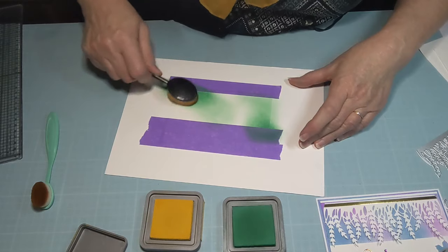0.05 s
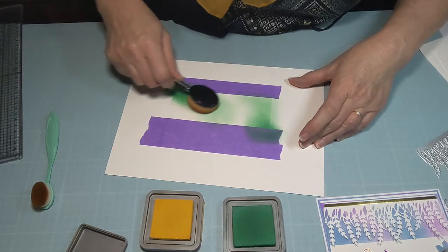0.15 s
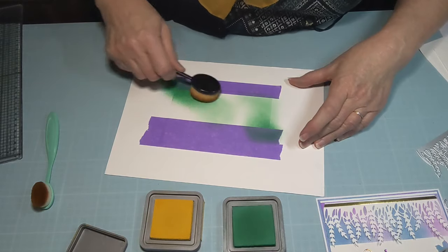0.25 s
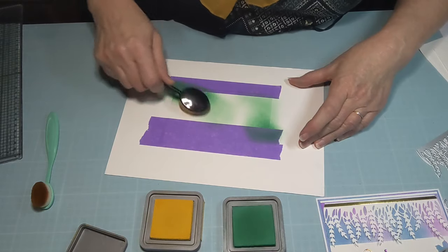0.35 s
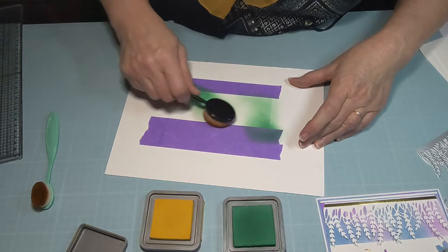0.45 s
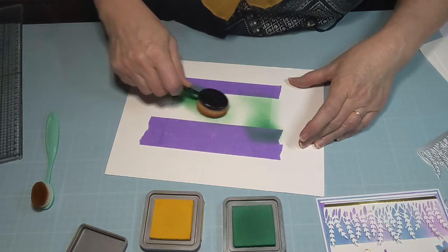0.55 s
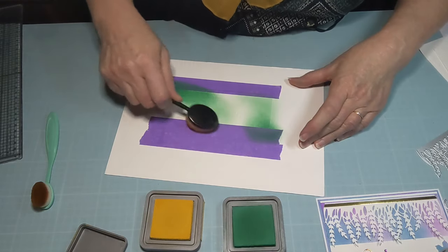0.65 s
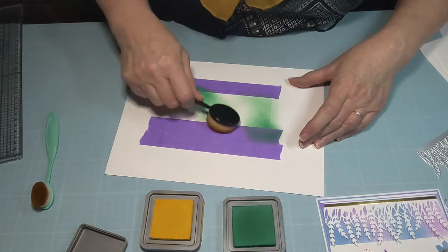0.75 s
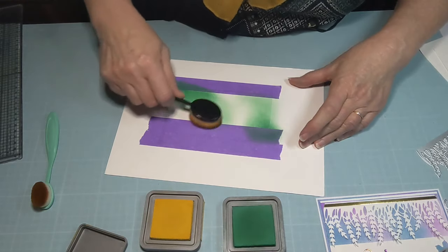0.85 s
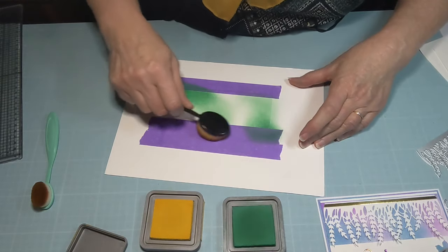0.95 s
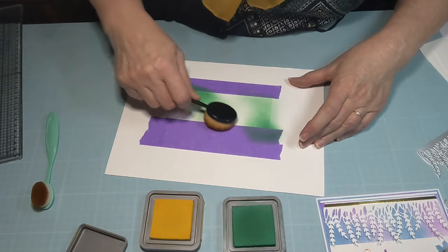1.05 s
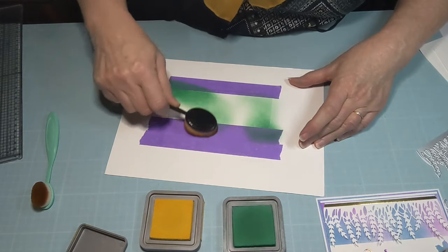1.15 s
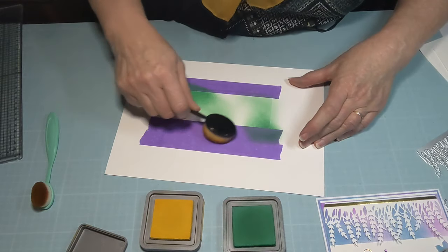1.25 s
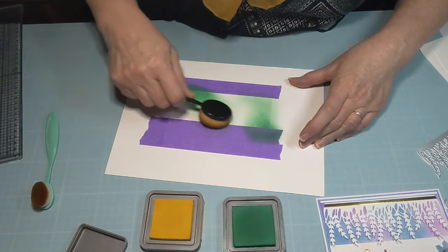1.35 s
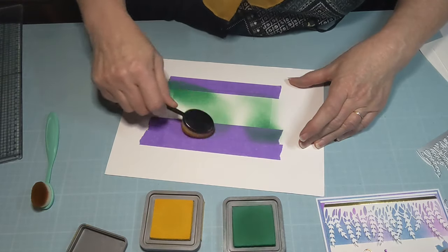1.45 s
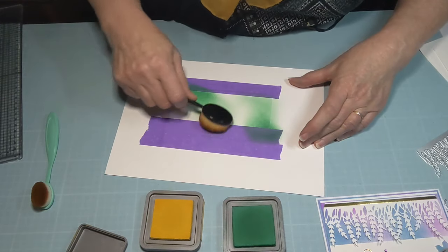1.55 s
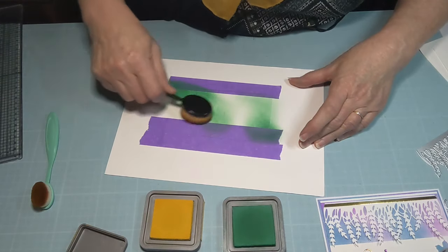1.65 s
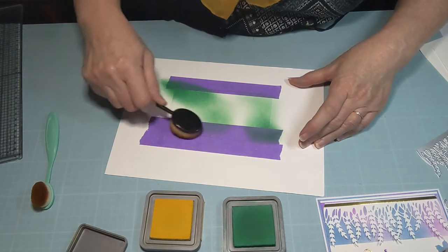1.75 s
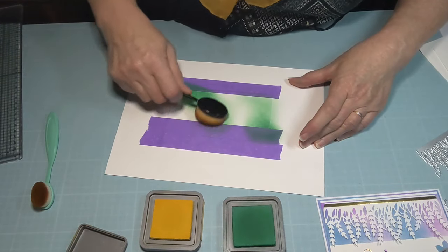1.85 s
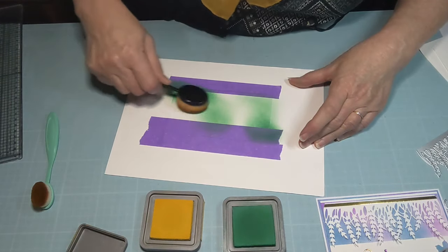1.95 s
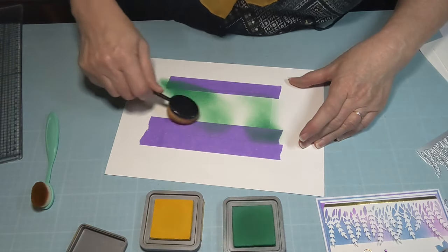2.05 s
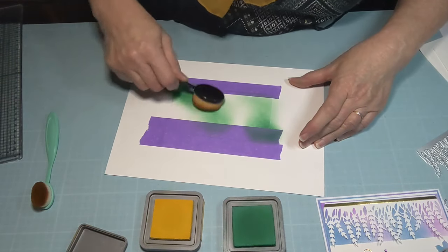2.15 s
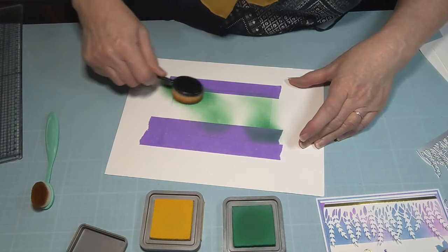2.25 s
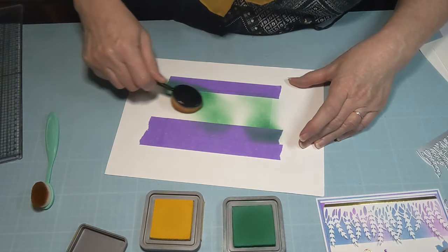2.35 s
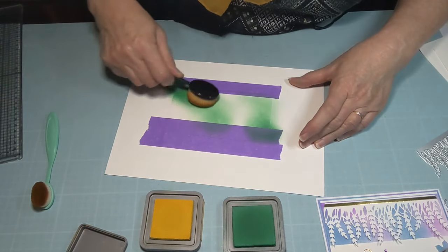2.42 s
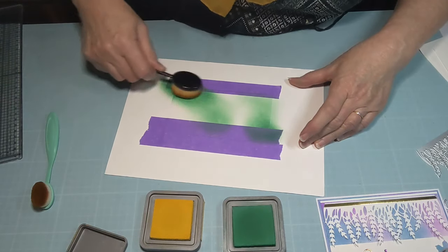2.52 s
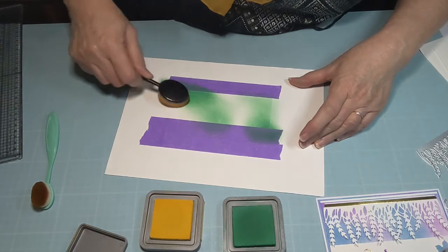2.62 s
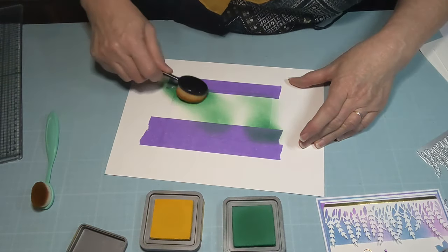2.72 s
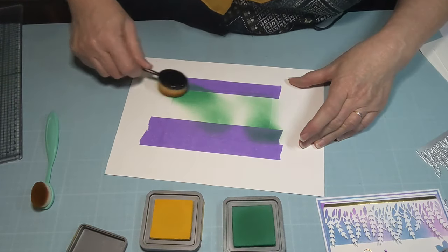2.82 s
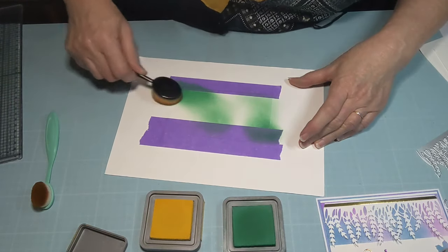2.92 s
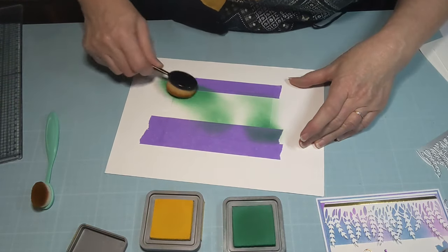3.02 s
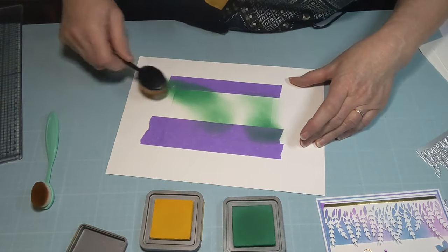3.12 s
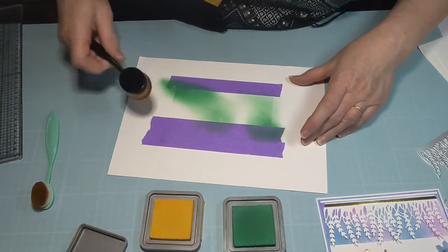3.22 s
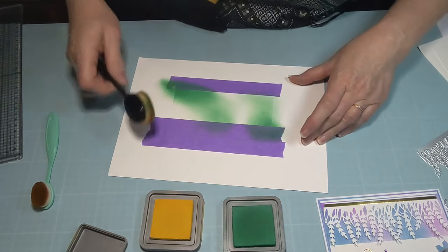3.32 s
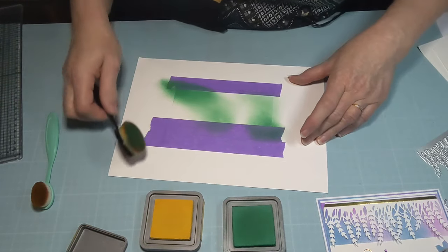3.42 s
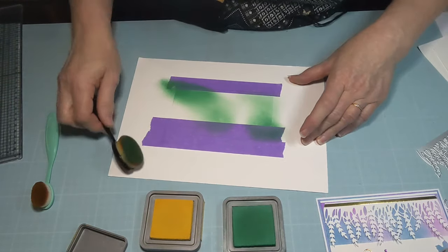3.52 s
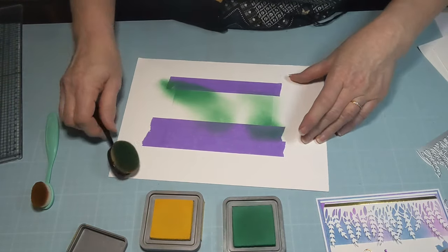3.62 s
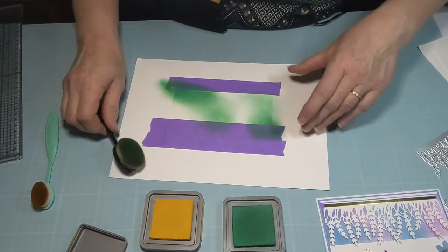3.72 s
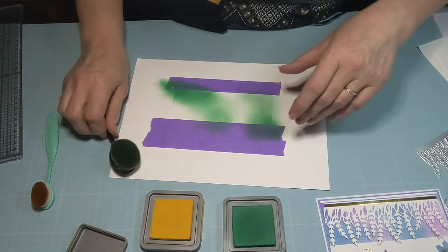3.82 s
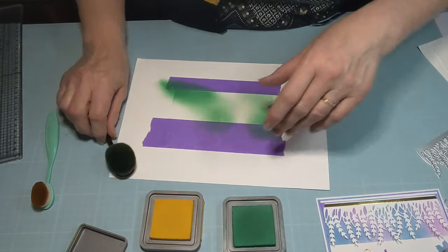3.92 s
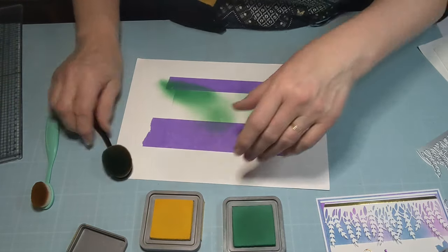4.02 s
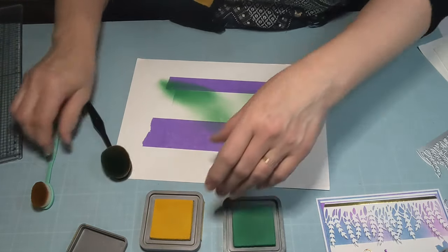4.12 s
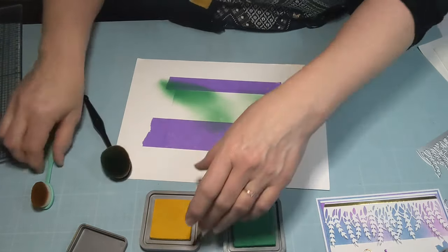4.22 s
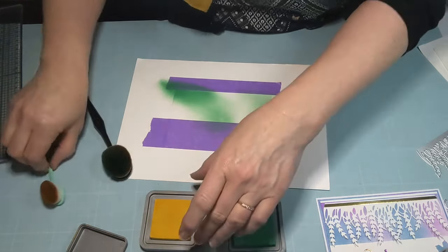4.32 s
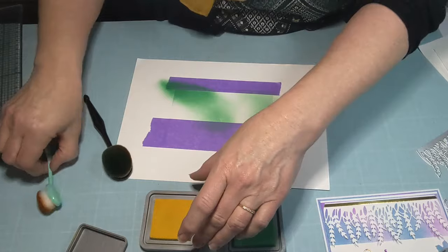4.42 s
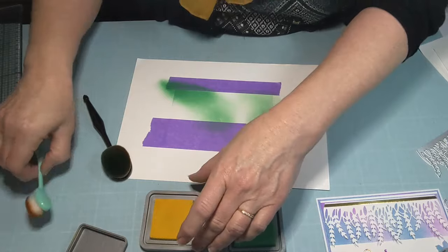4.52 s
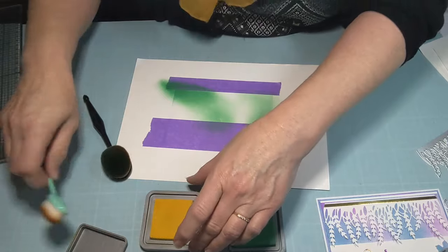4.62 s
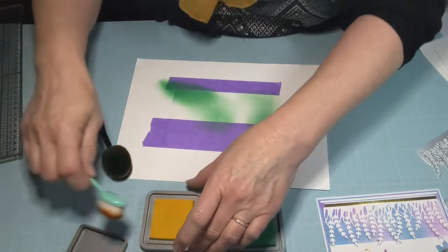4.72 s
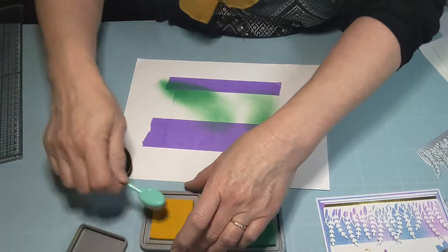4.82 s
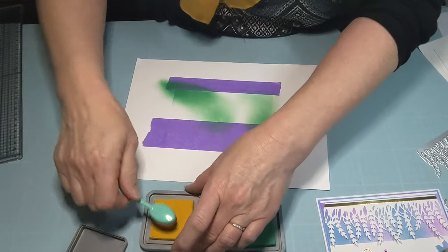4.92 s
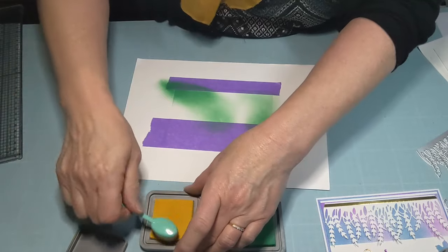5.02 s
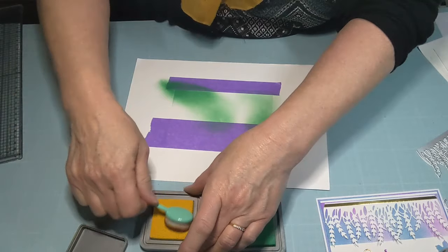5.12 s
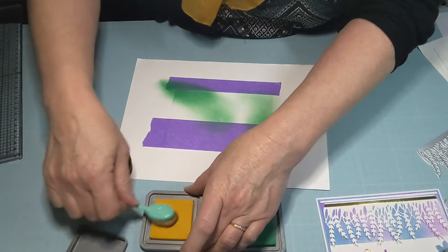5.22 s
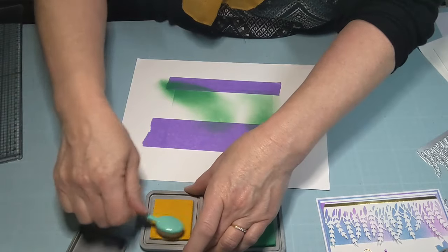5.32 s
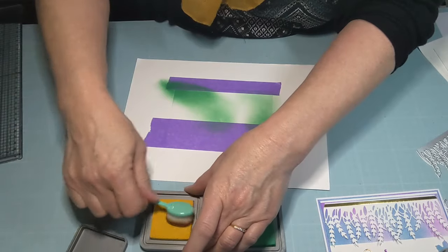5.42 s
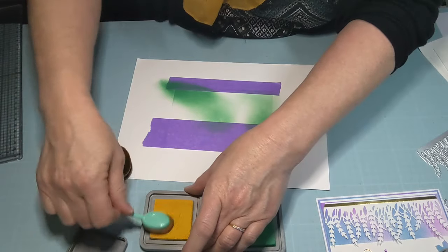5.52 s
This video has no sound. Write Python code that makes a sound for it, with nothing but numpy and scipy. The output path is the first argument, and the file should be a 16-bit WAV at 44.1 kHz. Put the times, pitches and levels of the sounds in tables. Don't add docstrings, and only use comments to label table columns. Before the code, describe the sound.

Airy bristle swishes, several each two seconds, play over a low room rumble and faint stereo hiss. After three seconds they stop; a hard brush handle strikes the tabletop, rocks and knocks again. A plastic click and gritty scrape follow as another brush is lifted, then a near-quiet gap and faint foam dabs with light bristle rustle. Overhead stereo microphones, small quiet room, short reverberation.

```python
import sys
import numpy as np
from scipy import signal
from scipy.fft import rfft, irfft, next_fast_len
from scipy.io import wavfile
from scipy.ndimage import map_coordinates

SR = 44100
rng = np.random.default_rng(int(sys.argv[2]) if len(sys.argv) > 2 else 0)


def store_wav(level_fs):
    pcm = np.round(np.clip(np.atleast_2d(level_fs), -1, 1) * 32767)
    wavfile.write(sys.argv[1], SR, pcm.T.astype(np.int16))


def gain_from_db(level_db):
    decades = np.asarray(level_db, float) / 20
    return 10 ** decades


N = 245676


def unit(x):
    return x / np.sqrt(np.mean(x ** 2) + 1e-20)


def along(points, hz):
    f, value = np.transpose(points)
    return np.interp(np.log(hz + 1), np.log(f + 1), value)


def wobble(rate):
    knots = rng.standard_normal(int(N * rate / SR) + 4)
    return map_coordinates(knots, [np.arange(N) * rate / SR])


def filtered(x, response):
    m = next_fast_len(x.shape[-1] + 8192)
    spectrum = rfft(x, m) * response(np.fft.rfftfreq(m, 1 / SR))
    return irfft(spectrum, m)[..., :x.shape[-1]]


def resonant(peaks):
    def response(f):
        total = 0
        for k, (centre, width, db) in enumerate(peaks):
            damping = 1j * f * width
            total = total + (-1) ** k * gain_from_db(db) * damping / (centre * centre - f * f + damping)
        return total
    return response


def pair(a, b, alike, lead):
    def turn(hz):
        return np.arccos(np.clip(alike(hz), -1, 1)) / 2

    def side(sign):
        shift = lambda hz: np.exp(0.5j * sign * lead(hz))
        common = filtered(a, lambda hz: np.cos(turn(hz)) * shift(hz))
        opposed = filtered(b, lambda hz: np.sin(turn(hz)) * shift(hz))
        return common + sign * opposed

    return np.array([side(1), side(-0.9)])


# f/Hz, left-right likeness
DIFFUSE_LIKENESS = [(60, 1), (130, 0.89), (290, 0.56), (640, 0.44), (1410, -0.057), (3100, -0.2),
                    (6820, -0.0067), (15000, -0.033)]


def diffuse(hz):
    return along(DIFFUSE_LIKENESS, hz)


# f/Hz, level per Hz/dB
VENTILATION = [(15, -47), (25, -16), (72, 2.5), (125, -3), (230, -12), (520, -19), (900, -33), (1980, -120)]
# f/Hz, level per Hz/dB
HISS_SPECTRUM = [(410, -4), (875, -3.5), (1620, -5), (4490, -11), (6150, -10.5), (9350, -11),
                 (13300, -17.5), (16000, -23)]
# f/Hz, width/Hz, lift/dB
STANDING_WAVES = [(56, 2, 9.5), (90, 16.3, -1), (122.8, 8.4, 0.5), (143.7, 3.9, -3), (311.5, 6.1, 5.5),
                  (347.3, 28, 3.5), (477, 46, 0.5), (665, 33, 6)]


def background():
    def lift(hz):
        return 1 + sum(gain_from_db(db) / (1 + (2 * (hz - f) / width) ** 2) for f, width, db in STANDING_WAVES)

    rumble = filtered(rng.standard_normal((2, N)), lambda hz: gain_from_db(along(VENTILATION, hz)) * lift(hz))
    hiss = filtered(rng.standard_normal((2, N)), lambda hz: gain_from_db(along(HISS_SPECTRUM, hz)))
    air = gain_from_db(-55.5 + 1.26 * wobble(9)) * unit(rumble) + gain_from_db(-65.0) * unit(hiss)
    return pair(*air, diffuse, lambda hz: 0.00065 * hz * (hz < 900))


USUAL_DB = -62.5


def played(rows, attack, release, overlap, grows):
    t, gains = np.arange(N) / SR, 0
    for start, end, first_db, last_db, tied_db in rows:
        rise, fall = (t - start + overlap) / attack, (end + overlap - t) / release
        edge = np.clip(np.minimum(rise, fall), 0, 1)
        main = edge * gain_from_db(np.interp(t, [start, end], [first_db, last_db]) - USUAL_DB)
        gains = np.maximum(gains, gain_from_db(USUAL_DB) * np.array([main, gain_from_db(tied_db) * main ** grows]))
    return gains


def slips(grain_db, patch_db):
    clumps = gain_from_db(patch_db * wobble(60) + patch_db * wobble(18))
    sizes = gain_from_db(grain_db * rng.exponential(size=(2, N)))
    return clumps * sizes * rng.standard_normal((2, N))


# start t/s, end t/s, first level/dB, last level/dB, pressure/dB
ARCS = [(0.01, 0.172, -56.5, -63.5, -6.5), (0.141, 0.43, -60.5, -63, -5.5),
        (0.396, 0.569, -55, -61.0, -5.5), (0.579, 0.84, -58, -59.5, -5.5),
        (0.857, 1.047, -58.0, -64.5, -3.5), (0.998, 1.095, -63, -61.5, -1),
        (1.102, 1.213, -60.0, -61.5, -4.5), (1.169, 1.281, -62, -59.5, -5.5),
        (1.258, 1.546, -62.5, -63, -5.0), (1.557, 1.728, -68.5, -58, -6), (1.677, 1.828, -55.0, -61.5, -7),
        (1.839, 2.111, -62, -56.5, -7), (2.133, 2.395, -59.5, -59.5, -6.0), (2.42, 2.545, -60, -66, -4),
        (2.533, 2.693, -58.0, -60.5, -5.5), (2.703, 2.848, -62.5, -67.5, -6.5),
        (2.821, 2.973, -58, -59.5, -8.0), (2.999, 3.169, -61.5, -65.0, -9), (3.173, 3.257, -68, -67, -17),
        (3.228, 3.305, -62, -63, -8.0), (3.262, 3.514, -61, -82, -13)]
PASSING_TOUCHES = [(3.675, 3.755, -55, -64.5, -8.5), (3.785, 3.84, -61.5, -64, -3),
                   (3.84, 3.885, -60, -66, -0.5), (4.56, 4.66, -67, -69.5, -16),
                   (4.66, 4.78, -64.5, -76, -12), (4.85, 4.97, -68, -72, -9), (5.05, 5.1, -66, -68, -12),
                   (5.13, 5.27, -69, -63, -5.5), (5.275, 5.375, -62, -60.5, -10), (5.39, 5.5, -62, -69, -5),
                   (5.49, 5.62, -63.5, -64, -5.5)]
# f/Hz, width/Hz, level/dB
BRISTLE_MODES = [(6030, 1820, -1), (8340, 950, 2), (9980, 1030, -2)]
# f/Hz, width/Hz, level/dB
PAPER_MODES = [(1025, 230, -0.5), (2600, 1620, 1)]
# f/Hz, width/Hz, level/dB
TIP_MODES = [(12040, 1900, 0)]
# f/Hz, left lead/rad
BRUSH_LEAD = [(0, -26), (1290, 1.2), (3450, 0.84), (6460, 3), (8010, 9), (10400, 8), (14500, 12.5),
              (16100, 4)]
RUB_GROWS, TIPS_GROW = 0.695, 1.13
TIPS_DB, TOUCH_TIPS_DB = -8.5, 4.5


def rubbing():
    bodies = (BRISTLE_MODES, PAPER_MODES, TIP_MODES)
    bristles, sheet, tips = [unit(filtered(slips(2.0, 1.09), resonant(body))) for body in bodies]
    arcs, rub = played(ARCS, attack=0.091, release=0.057, overlap=0.035, grows=RUB_GROWS)
    light, touch = played(PASSING_TOUCHES, attack=0.073, release=0.033, overlap=0.014, grows=RUB_GROWS)
    tip_speed = (arcs + gain_from_db(TOUCH_TIPS_DB) * light) / gain_from_db(USUAL_DB)
    mix = gain_from_db(3.0) * (arcs + light) * bristles
    mix += gain_from_db(3.5) * (rub + touch) * sheet
    mix += gain_from_db(USUAL_DB + TIPS_DB) * tip_speed ** TIPS_GROW * tips
    spread = pair(*mix, lambda hz: np.full_like(hz, 0.29), lambda hz: along(BRUSH_LEAD, hz))
    return spread * gain_from_db([[0.4], [-0.4]])


def ring(modes, t, attack, lift_db):
    hz, db, t60 = np.transpose(modes)[:, :, None]
    strength, start_phase, place = rng.standard_normal((3, len(modes), 1))
    side = np.array([1, -1])[:, None, None]
    phase = 0.41 * start_phase + side * (0.0001 * hz + 0.00062 * hz * place)
    decay = gain_from_db(db + lift_db(hz) + 2.4 * strength - 60 * t / t60)
    waves = decay * np.sin(2 * np.pi * hz * t + phase)
    return -waves.sum(1) * (1 - np.exp(-t / attack))


def soft(contact):
    return lambda f: 1 / (1 + 1.5j * (f * contact / 250) - (f * contact / 250) ** 2) ** 2


# t/s, peak level/dB, boom against peak/dB, contact time/ms, favoured mode f/Hz
TABLE_BLOWS = [(2.655, -54, -19, 0.18, 450), (3.5951, -19, -11.5, 0.2, 370), (3.6025, -20, -26, 0.23, 475),
               (3.627, -40, -24, 0.32, 560), (3.9075, -31, -6, 0.37, 364), (3.9158, -31, -20, 0.35, 406),
               (3.942, -33, -28, 0.28, 500), (4.0211, -27, -8, 0.35, 480), (4.030, -26, -22, 0.28, 480),
               (4.050, -39, -6, 0.3, 480), (4.087, -55.5, 15.5, 0.41, 480), (4.303, -45, -11, 0.2, 270),
               (4.3126, -22.5, -13, 0.1, 252), (4.320, -34, -4.5, 0.22, 260), (4.345, -49, -16, 0.14, 300),
               (4.401, -37.5, -10, 0.12, 278), (4.438, -41, -5, 0.36, 332), (4.454, -46, -11, 0.2, 382),
               (5.0594, -47, 3.5, 0.2, 520)]
# f/Hz, level/dB, t60/s
TOP_MODES = [(245.4, 3, 0.05), (286.3, 2, 0.057), (351, -3, 0.052), (427, 2, 0.036), (476.5, 1.5, 0.04),
             (606.5, -9.5, 0.24), (684, -5.5, 0.11), (775, -7.5, 0.099), (950, -8, 0.012),
             (1095, -5, 0.046), (1410, -25, 0.026), (1750, -31, .045), (2290, -3, 0.059)]
# f/Hz, level/dB, t60/s
FRAME_MODES = [(91.1, 5.5, 0.17), (119.8, -2, 0.15), (184, -3, 0.078)]
FRAME_DB_PER_OCTAVE, FRAME_EVEN_HZ = 16.5, 348
HAND_DAMPS_DB = 898


def knocks():
    out, t = np.zeros((2, N + SR)), np.arange(SR // 3) / SR
    for start, db, boom_db, contact, spot_hz in TABLE_BLOWS:
        top = ring(TOP_MODES, t, 0.0011, lambda hz: 7 * np.exp(-(np.log2(hz / spot_hz) / 0.14) ** 2))
        thud = pair(*rng.standard_normal((2, len(t))), diffuse, np.zeros_like) * gain_from_db(-60 * t / 0.1)
        thud = filtered(thud, lambda f: (1j * f / 220 / (1 + 1j * f / 220)) ** 2)
        damping = gain_from_db(-HAND_DAMPS_DB * contact * t)
        top = filtered((top + gain_from_db(5.5) * thud) * damping, soft(contact))
        tilt_db = FRAME_DB_PER_OCTAVE * np.log2(spot_hz / FRAME_EVEN_HZ)
        frame = ring(FRAME_MODES, t, 0.0028, lambda hz: tilt_db * (np.exp(-((hz - 124) / 20) ** 2) - 0.5))
        blow = top / np.abs(top).max() + gain_from_db(boom_db + 0.5) * frame
        first = round(start * SR)
        out[:, first:first + len(t)] += gain_from_db(db) * blow
    return out[:, :N]


# t/s, peak level/dB, centre f/Hz, width share of centre, t60/s
PLASTIC_TICKS = [(2.655, -56, 1150, 0.76, 0.055), (3.229, -57.5, 2160, 0.73, 0.024),
                 (3.276, -48.5, 6540, 0.55, 0.028), (3.592, -28.5, 9000, 1.5, 0.0071),
                 (3.5949, -29.5, 8900, 0.6, 0.022), (3.5949, -41.5, 2330, 0.94, 0.051),
                 (3.611, -48.5, 6700, 0.58, .05), (3.907, -49.5, 4800, 0.72, 0.06),
                 (3.941, -49, 2220, 0.25, 0.028), (3.9587, -44.5, 6730, 0.16, 0.041),
                 (3.997, -53.5, 1380, 0.15, 0.03), (4.023, -50.5, 6560, 1.5, 0.13),
                 (4.3065, -50, 3000, 2.5, 0.043), (4.316, -38.5, 5150, 1.4, 0.043),
                 (4.346, -51, 5000, 1, .04), (4.394, -48, 6000, 0.68, 0.033),
                 (4.403, -43, 7140, 0.26, 0.03), (5.1976, -41.5, 5500, 4.2, 0.016)]
LEFT_DB_PER_OCTAVE, CENTRED_HZ = 1, 3000


def ticks():
    out, t = np.zeros((2, N + SR)), np.arange(SR // 6) / SR
    for start, db, hz, share, t60 in PLASTIC_TICKS:
        body = lambda f: resonant([(hz, 1.5 * hz * share, 0)])(f) ** 2
        burst = filtered(rng.standard_normal((2, len(t))) * gain_from_db(-60 * t / t60), body)
        pan_db = LEFT_DB_PER_OCTAVE * np.log2(hz / CENTRED_HZ)
        pan = gain_from_db([[pan_db / 2], [-pan_db / 2]])
        first = round(start * SR)
        out[:, first:first + len(t)] += gain_from_db(db + 9) * burst / np.abs(burst).max() * pan
    return out[:, :N]


# f/Hz, t60/s
REVERBERATION = [(150, 0.1), (1000, 0.22), (6000, 0.18), (14000, 0.22)]


def room(x):
    hz, t, z = signal.stft(rng.standard_normal((2, SR // 3)), SR, nperseg=256)
    decay = gain_from_db(-60 * t / along(REVERBERATION, hz)[:, None])
    tail = signal.istft(z * decay, SR, nperseg=256)[1]
    tail = pair(*tail, diffuse, np.zeros_like)
    late = np.pad(x, ((0, 0), (130, 0)))
    return signal.fftconvolve(late, tail / np.linalg.norm(tail[0]), axes=1)[:, :N]


def scrape(spans, body, grit_hz, grain_db, patch_db):
    low, high = played(spans, attack=0.017, release=0.017, overlap=0.0085, grows=0.72)
    shake = unit(filtered(slips(grain_db, patch_db), resonant(body)))
    grit_band = lambda f: resonant([(grit_hz, 1.15 * grit_hz, 0)])(f) ** 2
    grit = unit(filtered(slips(grain_db, patch_db), grit_band))
    return pair(*(low * shake + high * gain_from_db(-1.0) * grit), diffuse, np.zeros_like)


# start t/s, end t/s, first level/dB, last level/dB, grit against drag/dB
HANDLE_DRAGS = [
    (3.915, 4.01, -45.5, -54, -10),
    (4.322, 4.385, -48, -51, -4),
    (4.375, 4.435, -47, -48, -7.5),
    (4.435, 4.51, -49, -63.5, -18),
]
# f/Hz, width/Hz, level/dB
DAMPED_TABLE = [(300, 130, -1), (480, 220, 1.5), (734, 270, -1), (1150, 104, 3), (1990, 820, -8.5)]


def handle_scrapes():
    return scrape(HANDLE_DRAGS, DAMPED_TABLE, grit_hz=4800, grain_db=2.0, patch_db=2.0)


# start t/s, end t/s, first level/dB, last level/dB, bright part/dB
SLEEVE_SLIDES = [
    (4.06, 4.31, -67.5, -64, -5),
    (4.49, 4.79, -69.5, -69, -21),
]
# f/Hz, width/Hz, level/dB
CLOTH_MODES = [(1090, 260, 5.5), (1760, 1000, -5.5)]


def sleeve_slides():
    return scrape(SLEEVE_SLIDES, CLOTH_MODES, grit_hz=5000, grain_db=0.5, patch_db=-1.5)


# t/s, peak level/dB, gap t/s
TIP_CHATTER = (4.3121, -24, .000735)


def snap():
    start, db, gap = TIP_CHATTER
    clicks = np.zeros(N)
    places = np.round((start + gap * np.arange(3)) * SR).astype(int)
    clicks[places] = gain_from_db(db + 15.5 + np.array([0, -0.5, -7]))
    click = filtered(clicks, lambda f: resonant([(6000, 6500, 0)])(f) ** 2)
    return np.array([click * gain_from_db(1.5), np.roll(click, -2) * gain_from_db(-1.5)])


# start t/s, end t/s, first level/dB, last level/dB, bright part/dB
PAD_DABS = [
    (5.13, 5.2, -70, -64, -3),
    (5.2, 5.27, -59.5, -65, -4),
    (5.285, 5.41, -63, -73, 2),
    (5.41, 5.475, -63, -60, -3),
    (5.475, 5.6, -64, -66, -3),
]
# f/Hz, width/Hz, level/dB
CASE_MODES = [(463, 26, 3.5), (673, 42, 3), (1120, 420, -8)]


def pad_dabs():
    return scrape(PAD_DABS, CASE_MODES, grit_hz=3530, grain_db=0.0, patch_db=0.5)


def scene():
    hits = knocks() + ticks() + snap()
    hits = filtered(hits, lambda f: 1 / (1 + (f / 11000) ** 4))
    friction = rubbing() + handle_scrapes() + sleeve_slides() + pad_dabs()
    return background() + friction + hits + gain_from_db(-9.0) * room(hits)


def top_cut(x):
    return signal.sosfilt(signal.butter(12, 16540, fs=SR, output="sos"), x)


def record(dry):
    low_cut = lambda f: (1j * f / 32 / (1 + 1j * f / 32)) ** 4
    mix = filtered(dry, lambda f: low_cut(f) * (f < 15760))
    return top_cut(mix)


dry = scene()
out = record(dry)
store_wav(out)
```